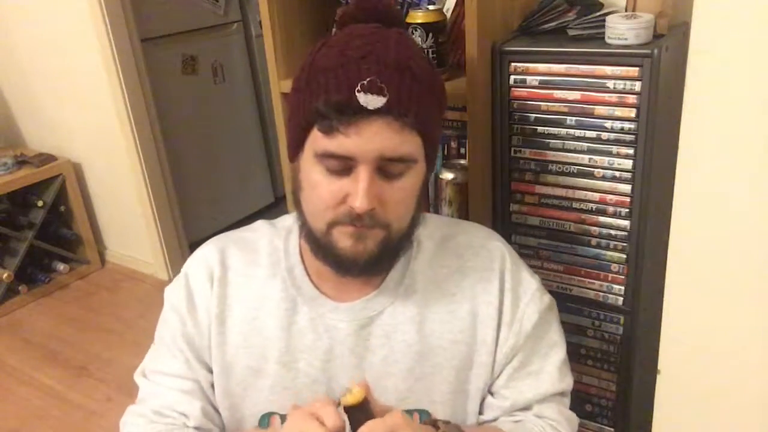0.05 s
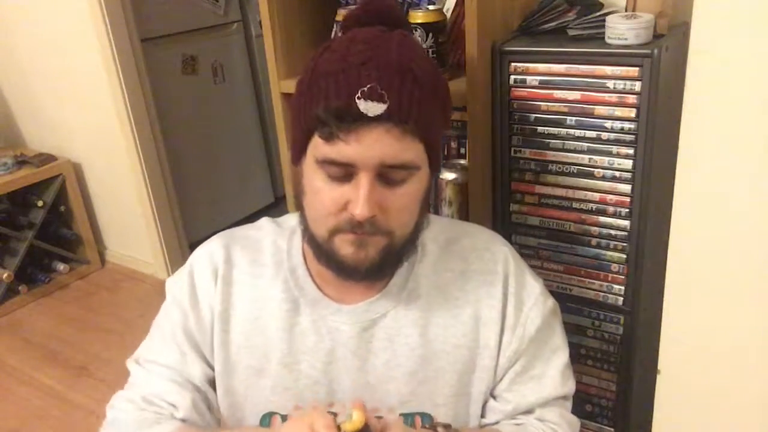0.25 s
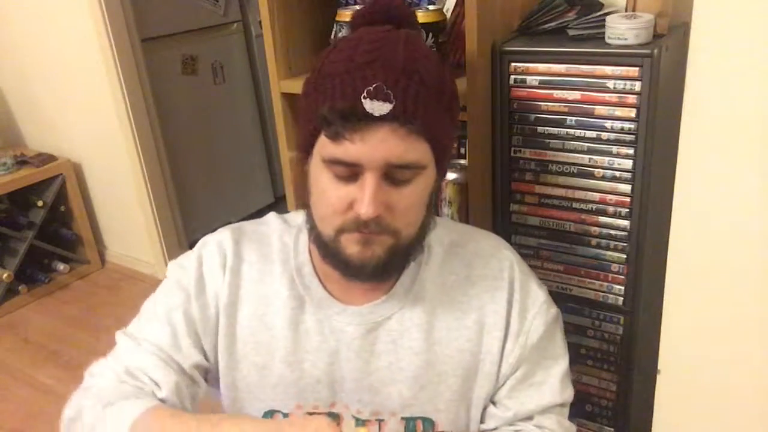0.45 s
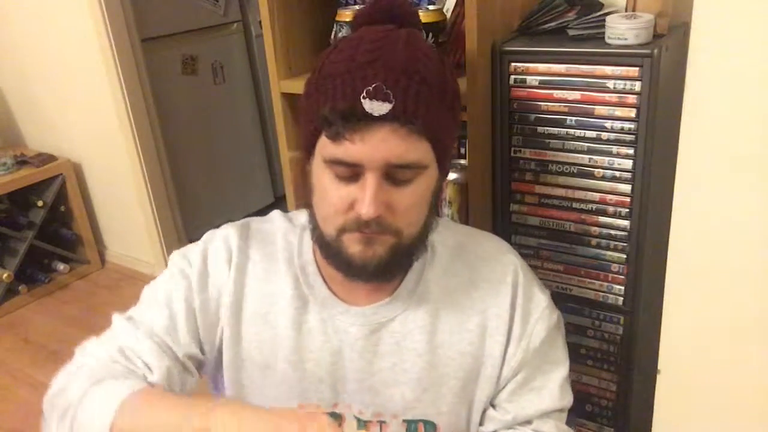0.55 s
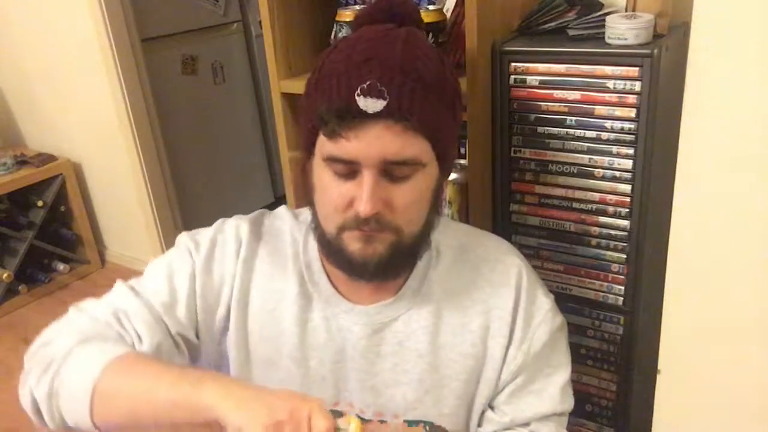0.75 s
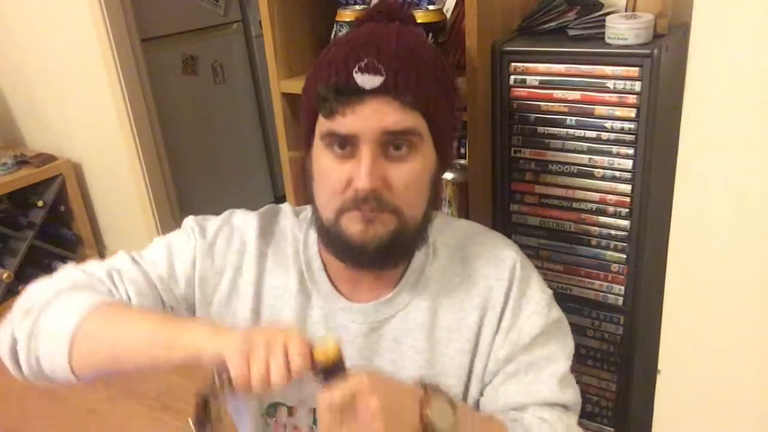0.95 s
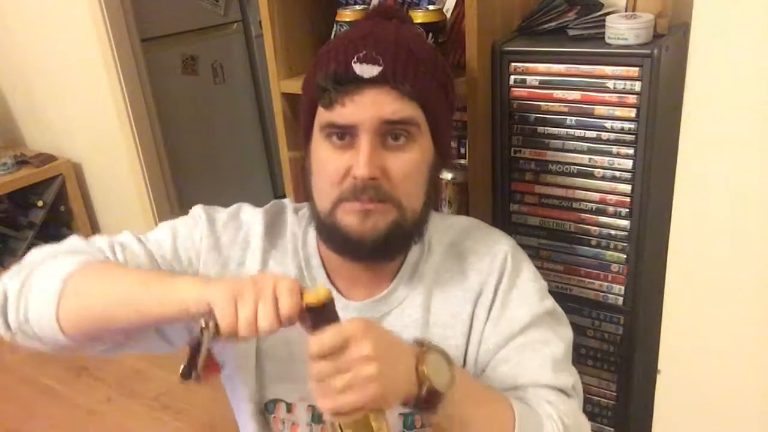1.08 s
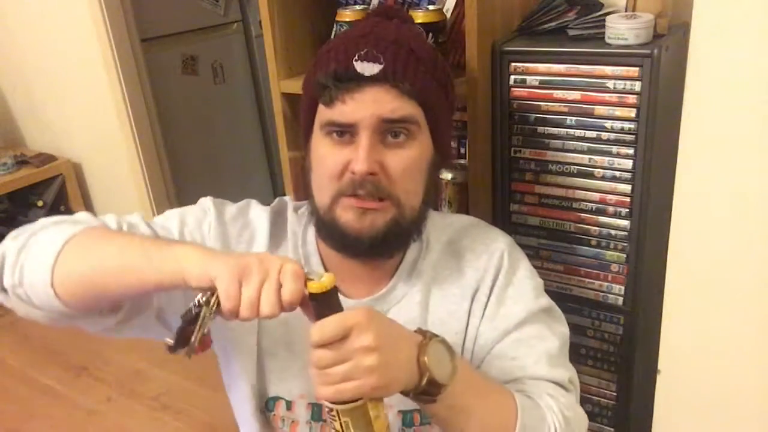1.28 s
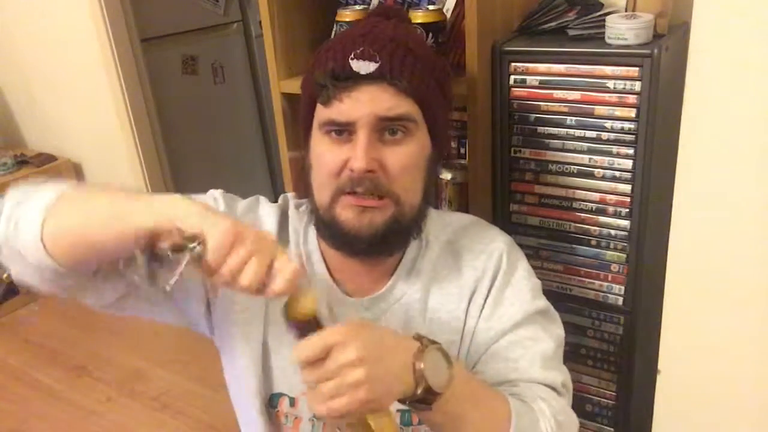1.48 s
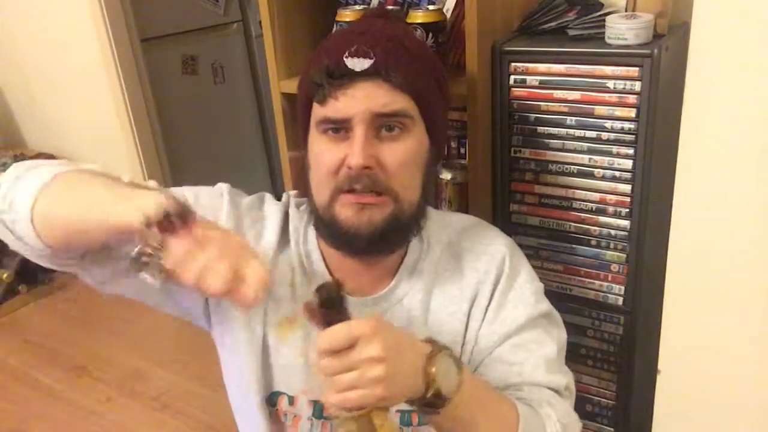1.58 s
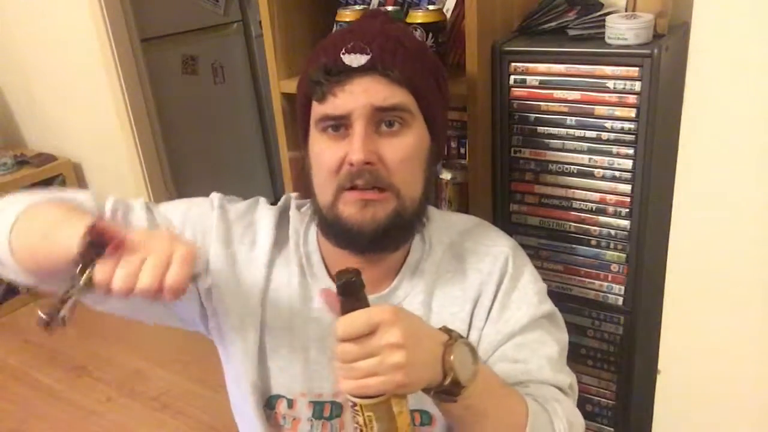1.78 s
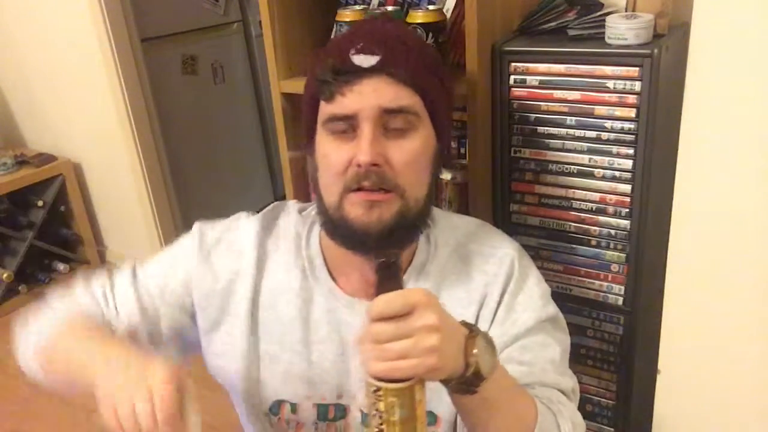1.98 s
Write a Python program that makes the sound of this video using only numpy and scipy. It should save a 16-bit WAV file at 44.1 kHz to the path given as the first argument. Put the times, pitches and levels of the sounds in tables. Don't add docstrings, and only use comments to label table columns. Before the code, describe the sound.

A crown cap comes off a glass bottle. Soft rustling and small clinks from 0 to 0.45 s, strongest near 0.1; a short gas hiss at 0.6-0.8; light metal ticks from 1.07 to 1.5. At 1.51-1.62 the cap breaks free in a sharp, bright cluster of snaps, scraping and ringing; another click at 1.68, then fading ticks and rustle. Short room tail, faint hum and hiss.

```python
import sys
import numpy as np
from scipy import signal
from scipy.fft import rfft, irfft
from scipy.io import wavfile
from scipy.ndimage import uniform_filter1d

SR = 44100
rng = np.random.default_rng(int(sys.argv[2]) if len(sys.argv) > 2 else 0)


def rack_gain(trim_db):
    fader = np.asarray(trim_db, float)
    return 10 ** (fader / 20)


def master_out(mix):
    frames = np.transpose(np.atleast_2d(mix))
    ceiling = np.clip(frames, -1, 1)
    pcm = np.round(ceiling * 32767).astype(np.int16)
    wavfile.write(sys.argv[1], SR, pcm)


N = 89478
RING_N = 13000
TICK_CYCLES = 48

# (time [s], peak [dB], ring [Hz], crack against ring [dB], ring t60 [s])
SNAPS = [(1.512, -43.5, 2960, -5, 0.099), (1.525, -45.5, 12800, 1.5, 0.021), (1.537, -43, 3950, 10, 0.11),
         (1.5465, -38.5, 8600, 2, 0.057), (1.552, -27.5, 6450, -33, 0.055), (1.561, -29, 5900, -21, 0.025),
         (1.5727, -44, 2860, -3, 0.0088), (1.575, -39, 2985, 0, 0.1), (1.581, -20, 6420, -1, 0.022),
         (1.5885, -27.5, 9340, 4, 0.031), (1.5892, -28.5, 6600, 3, 0.033), (1.5931, -26, 7300, 3.5, 0.016),
         (1.597, -25.5, 5540, 4, 0.0096), (1.6042, -31.5, 9470, -9, 0.031), (1.6115, -40, 2670, -16, 0.016),
         (1.6192, -28, 2714, -1.5, 0.014), (1.622, -29.5, 5220, 2, 0.0041), (1.604, -39, 3840, -4, 0.0048)]


def evened(x):
    return x / np.sqrt(np.mean(x ** 2) + 1e-20)


def read(points, hz):
    f, value = np.transpose(points)
    return np.interp(np.log(hz + 1), np.log(f + 1), value)


def add(mix, s, sound):
    part = mix[round(s * SR):][:len(sound)]
    part += sound[:len(part)]


def coloured(x, colour):
    gain = rack_gain(read(colour, np.fft.rfftfreq(len(x), 1 / SR)))
    return evened(irfft(rfft(x) * gain, len(x)))


def level(curve):
    s, db = np.transpose(curve)
    return rack_gain(np.interp(np.arange(N) / SR, s, db, left=-140, right=-140))


def wander(n, size):
    return evened(uniform_filter1d(uniform_filter1d(rng.standard_normal(n), size), size))


def fuzz(share, size):
    return 1 + share * wander(RING_N, size)


def ring(hz, t60, rise_s=0.0003):
    t = np.arange(RING_N) / SR
    decay = rack_gain(-60 * t / max(t60, .003))
    return np.sin(2 * np.pi * hz * t) * decay * np.minimum(t / rise_s, 1)


def grit(per_s, size_db, smooth):
    size = rack_gain(size_db * np.minimum(rng.exponential(1, N), 4))
    clicks = size * (rng.random(N) < per_s / SR) * rng.standard_normal(N)
    return evened(clicks) + smooth * rng.standard_normal(N)


def hiss(curve, colour, x):
    dull_hz, dulling = 9500, 0.43
    gain, x = level(curve), coloured(x, colour)
    low = signal.lfilter(*signal.butter(2, dull_hz, fs=SR), x)
    treble = x - low
    return gain * (low + treble * (gain / gain.max()) ** dulling)


def hit(peak_db, hz, crack_db, t60, tilt_db):
    # (frequency [Hz], level [dB])
    crack_colour = [(500, -78), (1200, -1), (3000, 6), (8000, -0.5), (10200, -11.5), (12500, -2.5),
                    (16000, -14.5)]
    spread, side_db = .035, -11
    crack_s, chatter_s, chatter = .0013, .007, .25
    lead = 32

    sides = sum(ring(hz * (1 + spread * d), t60) for d in 2 * rng.random(2) - 1)
    tone = ring(hz, t60) + rack_gain(side_db) * sides
    t = np.arange(2048) / SR
    decay = np.exp(-t / crack_s) + chatter * np.exp(-t / chatter_s)
    burst = np.roll(rng.standard_normal(2048) * decay, lead)
    tilted = [(f, db + tilt_db * np.log2(f / 4000)) for f, db in crack_colour]
    crack = np.zeros(len(tone))
    crack[:2048 - lead] = rack_gain(crack_db - 18.5) * coloured(burst, tilted)[lead:]
    return rack_gain(peak_db - 4) * signal.lfilter(*signal.butter(2, 700, "high", fs=SR), [tone, crack])


def ticks(rows):
    mix = np.zeros((N, 2))
    for s, db, hz, crack_db, tilt_db in rows:
        add(mix, s, hit(db, hz, crack_db, TICK_CYCLES / hz, tilt_db).T)
    return mix.T


def background():
    # (frequency [Hz], level [dB])
    floor_colour = [(31, -24), (43, 3.5), (103, -8.5), (160, -9.5), (300, -11.5), (600, -17.5), (6500, -39),
                    (16500, -37)]
    floor_db, hum_hz, hum_db, wobble_db = -74, 99.2, -69, -1.7
    hum_gain = np.sqrt(2) * rack_gain(hum_db + wobble_db * wander(N, 2000))
    hum = hum_gain * np.sin(2 * np.pi * hum_hz * np.arange(N) / SR)
    return hum + rack_gain(floor_db) * coloured(rng.standard_normal(N), floor_colour)


def rustle():
    # (time [s], level [dB])
    hands = [(0, -60.5), (.04, -53), (.1, -60.5), (.3, -74), (.39, -75), (.41, -70.5), (.52, -77),
             (1.38, -80.5), (1.42, -71.5), (1.5, -71.5), (1.8, -63.5), (2.03, -73.5)]
    # (frequency [Hz], level [dB])
    hands_colour = [(300, -8.5), (1500, -1), (4100, -2.5), (6200, -7.5), (10500, -19), (16000, -22)]
    return level(hands) * coloured(grit(1500, 1.5, 1.5), hands_colour)


def keys():
    # (time [s], peak [dB], ring [Hz], crack against ring [dB], crack tilt [dB per octave])
    key_ticks = [(.314, -64, 4000, 11, -1), (.327, -64.5, 2520, 6, -3), (.3375, -55, 3950, 2.5, -1),
                 (.3485, -69, 9000, 7, 6), (.3945, -63, 4290, 7.5, 2), (.4135, -56, 8500, 2, 8),
                 (.461, -64, 12500, 9, 10), (.567, -70, 12000, 8, 7), (1.2178, -64, 13500, -3, 8),
                 (1.3145, -64, 3920, -2, -7), (1.350, -63, 4350, 4, -3), (1.392, -71, 13000, 0, 12),
                 (1.431, -65, 6500, 1, 5), (1.731, -50, 12000, 9, 4), (1.818, -62, 4900, 6, 4),
                 (1.902, -63, 15100, 0, 14), (1.911, -54.5, 6700, 2.5, 4), (1.963, -57, 10000, -7, 1),
                 (2.011, -65, 5500, 6, 5)]
    return sum(ticks(key_ticks))


def shivers():
    starts = [.019, .02, .112, .111, .110, .110, .110, .221, .405, .405, .572, 1.281, 1.408, 1.088, 1.932,
              1.945, 1.512, 1.95]
    # (level [dB], t60 [s], centre [Hz], width [octaves])
    bands = [(-56.5, 0.12, 12000, 0.56), (-59, 0.34, 2640, .1), (-53.5, 0.23, 2080, 0.22),
             (-59.5, 0.37, 5640, 0.12), (-50.5, 0.23, 7500, 0.11), (-57, 0.17, 11000, 0.07),
             (-59, .25, 14200, .08), (-59, 0.39, 5450, 0.26), (-61.5, 0.42, 4100, 0.87),
             (-71.5, .4, 15000, 0.44), (-67, 0.2, 4000, 0.054), (-69, 0.26, 6400, .2),
             (-67.5, 0.21, 6200, 0.13), (-61, 0.26, 62, .4), (-63.5, 0.22, 440, 0.52),
             (-63.5, 0.38, 63, 0.36), (-50.5, 0.1, 1430, 0.54), (-66.5, 0.41, 1170, 0.38)]
    rise_s = 0.001
    mix, t = np.zeros(N), np.arange(16384) / SR
    f = np.fft.rfftfreq(len(t), 1 / SR) + 1
    for s, (db, t60, hz, octaves) in zip(starts, bands):
        bell = np.exp(-.5 * (np.log2(f / hz) / octaves) ** 2)
        band = evened(irfft(rfft(rng.standard_normal(len(t))) * bell))
        add(mix, s, rack_gain(db - 60 * t / t60) * np.minimum(t / rise_s, 1) * band)
    return mix


def knocks():
    starts = [.011, .051, .1085, 1.955, 1.089, 1.099, 1.5118, 1.5118, 1.517, 1.5765, 1.579, 1.593, 1.596,
              1.536, 1.934, 1.933, 1.953, .219, 2.026]
    # (peak [dB], mode [Hz], t60 [s])
    modes = [(-54.5, 272, 0.12), (-50, 300, 0.062), (-61, 1700, .015), (-60.5, 140, 0.11),
             (-57, 236, 0.088), (-59.5, 690, 0.023), (-37, 910, 0.025), (-42, 1800, 0.011),
             (-41.5, 1234, 0.075), (-38.5, 1500, 0.021), (-47.5, 1280, .057), (-55, 1053, 0.034),
             (-40, 1330, 0.058), (-45.5, 1980, .015), (-50.5, 640, 0.022), (-43, 1480, 0.011),
             (-53.5, 424, 0.033), (-45.5, 5500, 0.022), (-54, 540, .015)]
    mix = np.zeros(N)
    for s, (db, hz, t60) in zip(starts, modes):
        add(mix, s, rack_gain(db) * fuzz(0.36, size=250) * ring(hz, t60, rise_s=0.0011))
    return mix


def clink():
    # (frequency [Hz], level [dB], t60 [s])
    modes = [(2165, 1, 0.093), (2420, 17, 0.019), (2297, 2.5, 0.12), (2643, -11, 0.15), (2767, 1.5, 0.12),
             (2994, -1, 0.15), (3065, -2.5, 0.19), (6352, 0, 0.036), (6800, -3, 0.034)]
    start_s, clink_db = .0545, -43.5
    mix = np.zeros(N)
    for hz, db, t60 in modes:
        add(mix, start_s, rack_gain(clink_db + db) * fuzz(0.85, size=100) * ring(hz, t60, rise_s=0.004))
    return mix


def touches():
    # (time [s], peak [dB], ring
    # [Hz], crack against ring [dB], crack tilt [dB per octave])
    contacts = [(.0034, -52.5, 2240, 0, -25), (0.0194, -43.5, 9300, 3, 26), (0.1082, -35, 7400, 8.5, 5.5),
                (.219, -47, 4080, 9.5, -0.5), (0.4065, -59, 6100, 5, 0), (0.4305, -52.5, 4260, 2.5, 1.5),
                (.5716, -67, 4000, 5, 4), (0.6052, -59, 1650, 1, -10), (.672, -56, 2180, 15.5, 0),
                (0.7527, -53.5, 1580, 5, -1.5), (0.841, -68, 2350, 10, 3), (.8758, -63, 1540, 7.5, -2.5),
                (1.0672, -60, 3900, -1.5, -24), (1.089, -56, 1600, 7, -12), (1.0986, -55, 2040, 2, -11.5),
                (1.151, -53.5, 4040, -2.5, -3.5), (1.201, -50.5, 5380, -8, 1), (1.2218, -41, 4300, -4, -5.5),
                (1.273, -49.5, 4300, -0.5, -1), (1.2772, -49.5, 3470, -2.5, -2),
                (1.3832, -55.5, 3730, -0.5, -4), (1.4072, -47.5, 3900, -5, -0.5), (1.4371, -54.5, 3730, 2, 1),
             (1.4870, -47.5, 4000, -10, -13), (1.6775, -37, 3740, 4.5, 6),
             (1.679, -29.5, 10300, -5.5, -4.5), (1.7074, -46.5, 3150, 8, -4), (1.7156, -43, 5550, 7.5, 4),
             (1.7915, -49, 5500, -6, 3), (1.835, -49, 3970, 3, -4.5), (1.844, -52, 3340, 0, 2.5),
             (1.884, -55, 7200, -4, 18), (1.9086, -67, 2700, 8, -1), (1.952, -51.5, 3010, 8, -1),
             (1.979, -51.5, 3970, -23, 0)]
    return ticks(contacts)


def leak():
    # (time [s], level [dB])
    gas = [
        (.6, -71),
        (.62, -49.5),
        (.638, -42),
        (.668, -44.5),
        (.686, -51.5),
        (.73, -59.5),
        (.82, -78),
    ]
    # (frequency [Hz], level [dB])
    gas_colour = [(400, -26), (1400, -18.5), (4000, -8.5), (8500, -1.5), (12000, -1.5), (13300, -7.5),
                  (16000, -6.5)]
    return hiss(gas, gas_colour, grit(4700, 1.5, 10.0))


def jingle():
    total = np.zeros(N)
    for s, db, hz, crack_db, t60 in SNAPS:
        ping = ring(hz, TICK_CYCLES / hz)[:2048]
        total += signal.oaconvolve(grit(40, 3.0, 0), ping)[:N]
    return rack_gain(-7) * evened(total)


def rattle():
    # (time [s], level [dB])
    scrape = [
        (1.511, -53),
        (1.545, -54.5),
        (1.6, -42.5),
        (1.65, -50.5),
        (1.73, -53),
        (1.79, -66),
        (1.9, -88),
    ]
    # (frequency [Hz], level [dB])
    scrape_colour = [(500, -5.5), (1100, 4), (3000, -6.5), (4000, 11.5), (6500, 0), (11000, 1.5),
                     (16000, 3)]
    return hiss(scrape, scrape_colour, grit(2500, 2.5, 1.0)) + level(scrape) * jingle()


def neck():
    starts = [1.5935, 1.625, .113, .112, .112, 1.513, .221, .222]
    # (peak [dB], frequency [Hz], t60 [s])
    modes = [
        (-40, 1055, 0.18),
        (-45.5, 1055, 0.12),
        (-51, 1112, 0.19),
        (-68, 5230, .22),
        (-54, 1800, 0.13),
        (-60, 318, 0.098),
        (-58.5, 4000, .15),
        (-58, 5490, 0.23),
    ]
    mix = np.zeros(N)
    for s, (db, hz, t60) in zip(starts, modes):
        add(mix, s, rack_gain(db) * ring(hz, t60, rise_s=0.0012))
    return mix


def snaps():
    # (frequency [Hz], level [dB], t60 [s])
    cap_modes = [(3950, -23, 0.065), (8600, -18, 0.029), (10160, -24, 0.037), (14200, -23, 0.022)]
    mix = np.zeros(N)
    for s, db, hz, crack_db, t60 in SNAPS:
        add(mix, s, sum(hit(db, hz, crack_db, t60, tilt_db=1.5)))
        for cap_hz, cap_db, cap_t60 in cap_modes:
            uneven_db = 2 * rng.standard_normal()
            add(mix, s, rack_gain(db + cap_db + uneven_db) * ring(cap_hz, cap_t60))
    return mix


def room(x):
    # (frequency [Hz], t60 [s])
    decay = [(1000, 0.36), (3000, 0.28), (6000, 0.24), (10000, 0.27), (16000, 0.084)]
    room_db, gap_s = -6.5, .004
    taps = np.zeros(SR // 2)
    at = np.arange(0, SR // 2 - 20, 10)
    taps[at + rng.integers(0, 10, len(at))] = rng.choice([-1., 1.], len(at))
    hz, t, z = signal.stft(taps, SR, nperseg=128)
    z = z * rack_gain(-60 * t / read(decay, hz)[:, None])
    tail = signal.istft(z, SR, nperseg=128)[1]
    tail = np.r_[np.zeros(round(gap_s * SR)), tail / np.linalg.norm(tail)]
    return rack_gain(room_db) * signal.fftconvolve(x, tail)[:N]


def scene():
    rings, cracks = touches()
    struck = cracks + knocks() + clink() + snaps()
    sent = struck + rack_gain(-4) * rings
    friction = rustle() + leak() + rattle()
    mix = background() + friction + keys() + shivers() + neck() + struck + rings + room(sent)
    return mix[None]


def band_limit(x):
    return signal.sosfilt(signal.butter(12, 16810, fs=SR, output="sos"), x)


def record(dry):
    edge_hz = 15800
    lowpass = signal.firwin(301, edge_hz, window=("kaiser", 4), fs=SR)
    return band_limit(signal.oaconvolve(dry, lowpass[None], "same"))


dry = scene()
out = record(dry)
master_out(out)
```